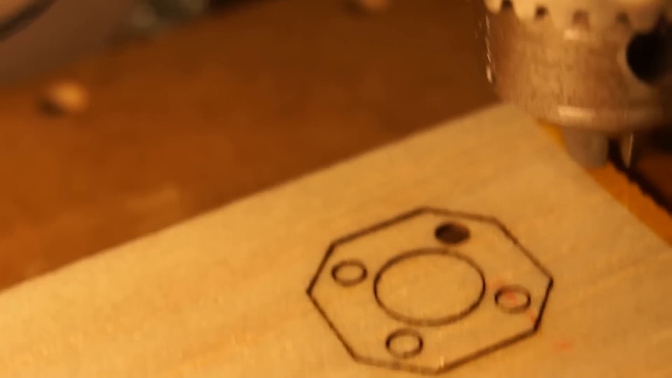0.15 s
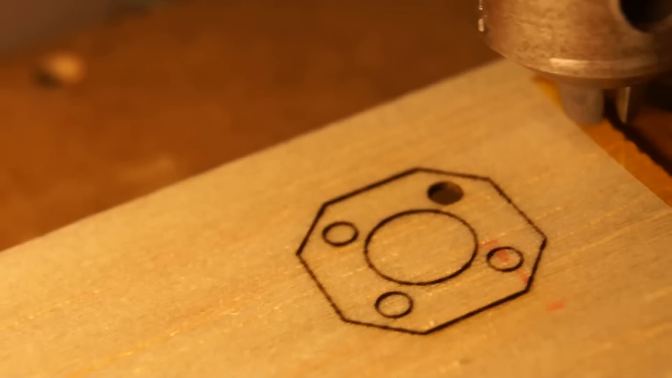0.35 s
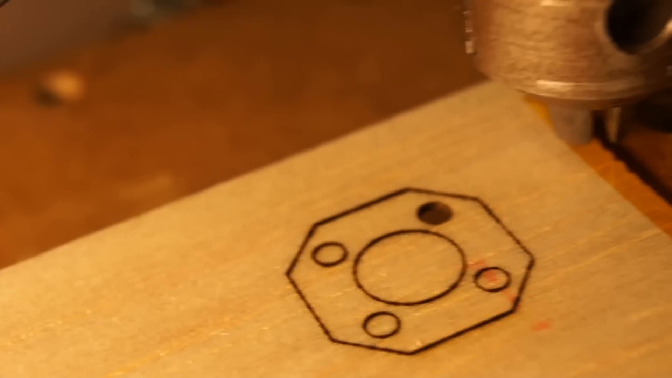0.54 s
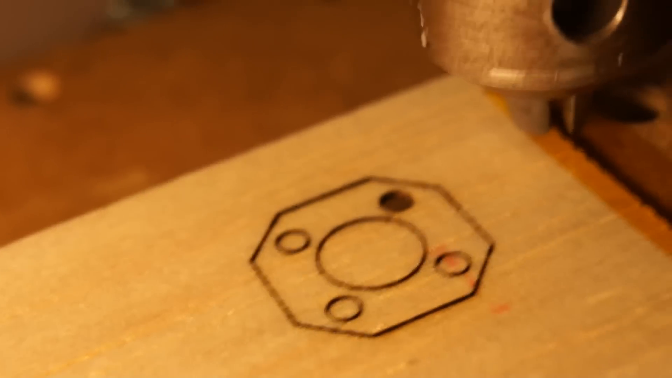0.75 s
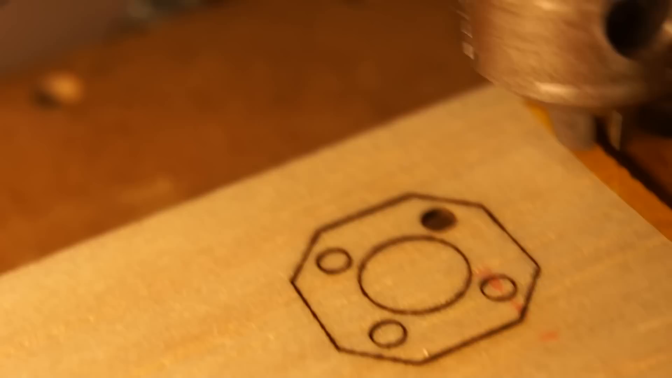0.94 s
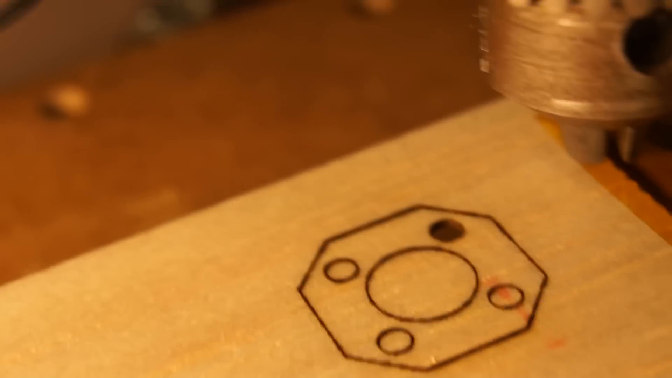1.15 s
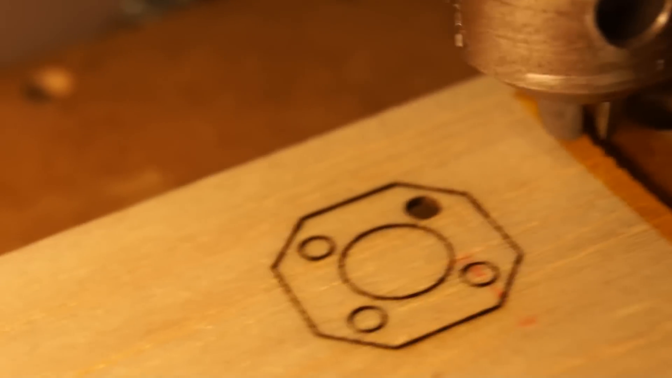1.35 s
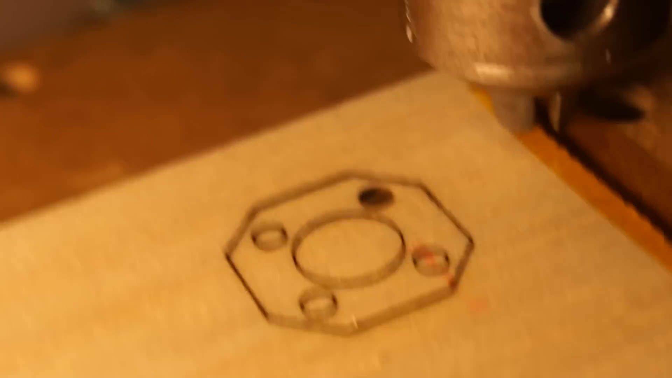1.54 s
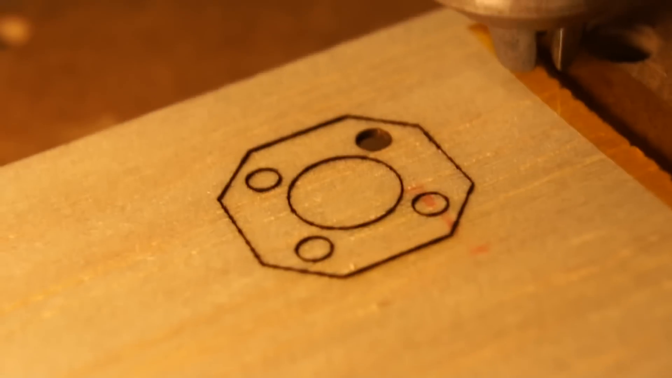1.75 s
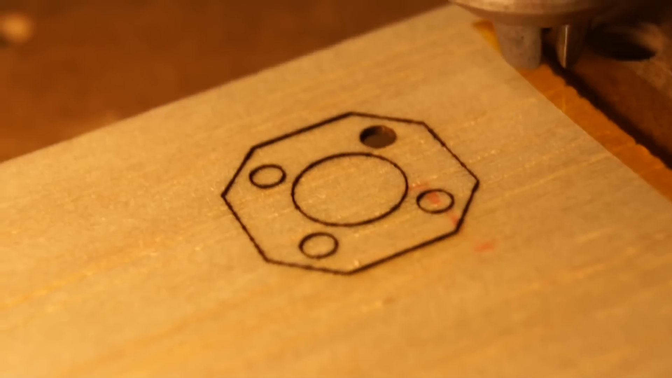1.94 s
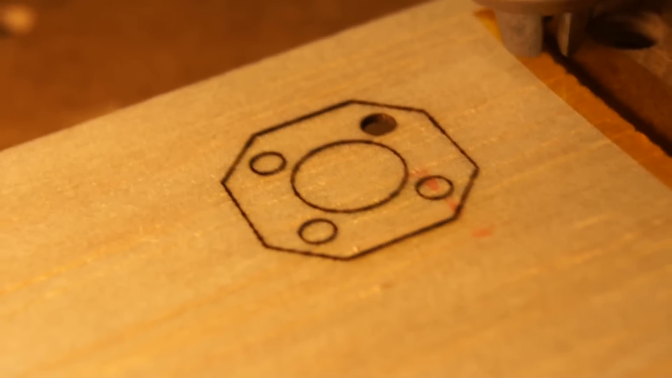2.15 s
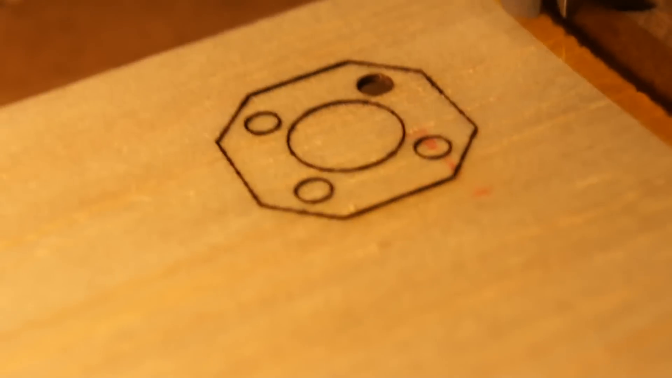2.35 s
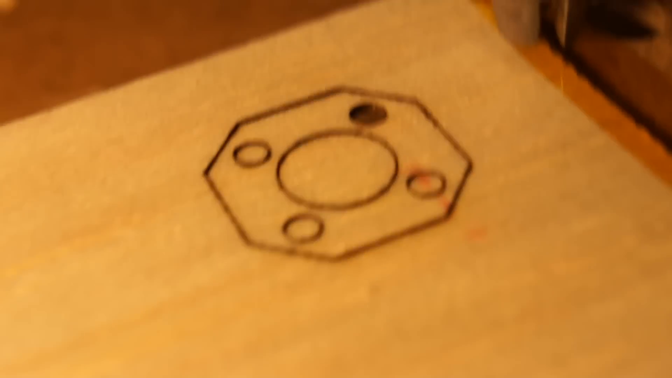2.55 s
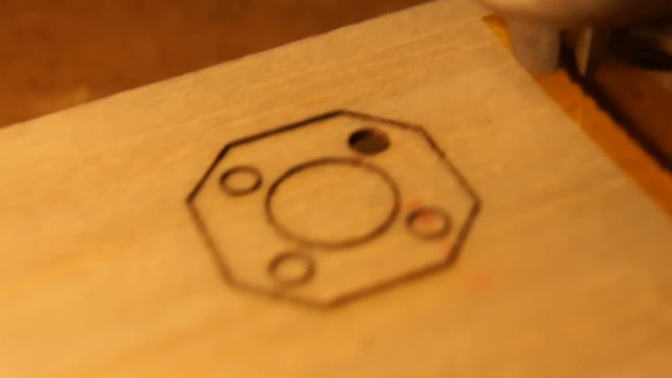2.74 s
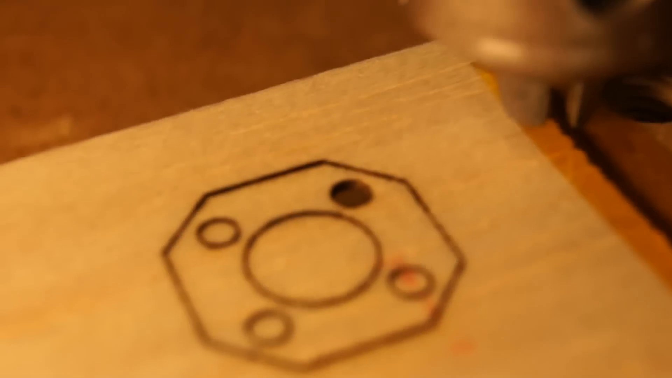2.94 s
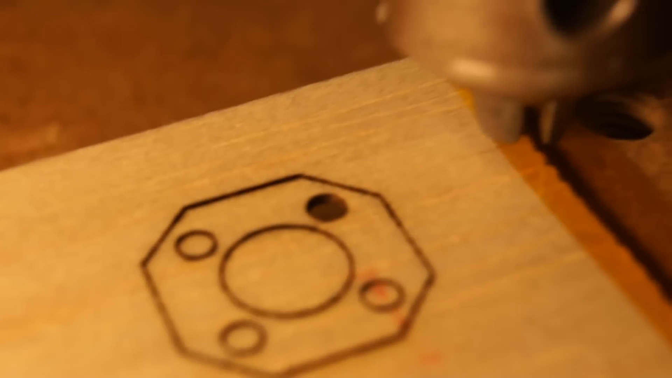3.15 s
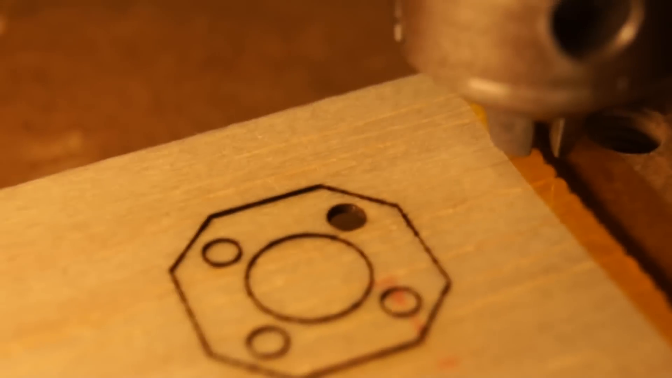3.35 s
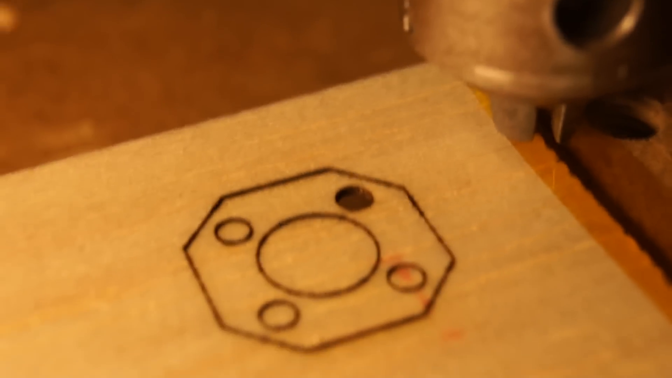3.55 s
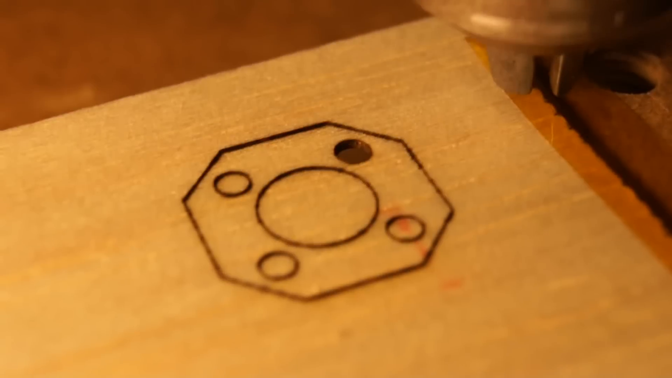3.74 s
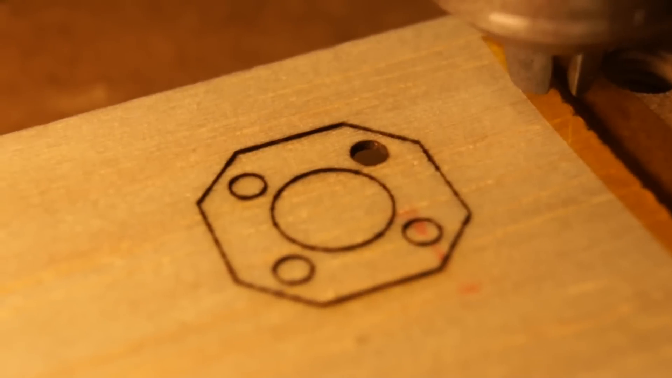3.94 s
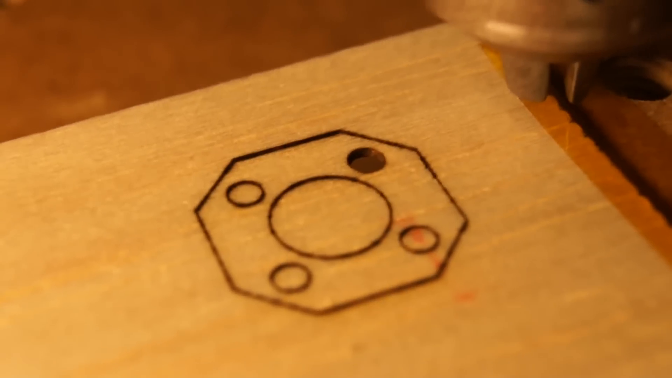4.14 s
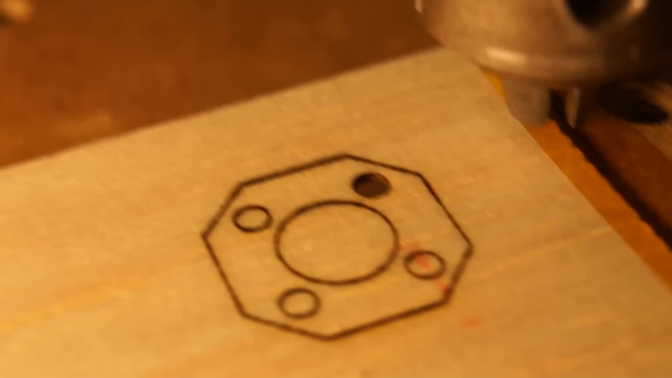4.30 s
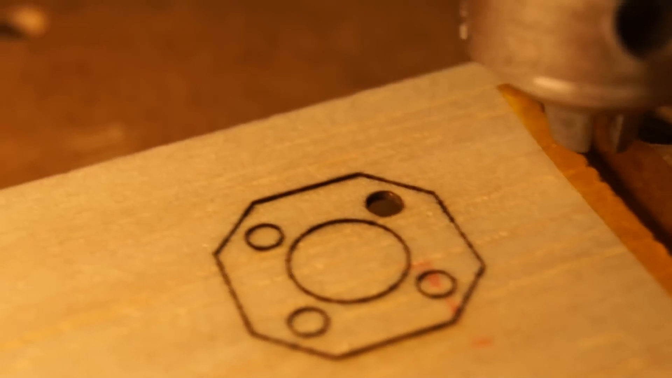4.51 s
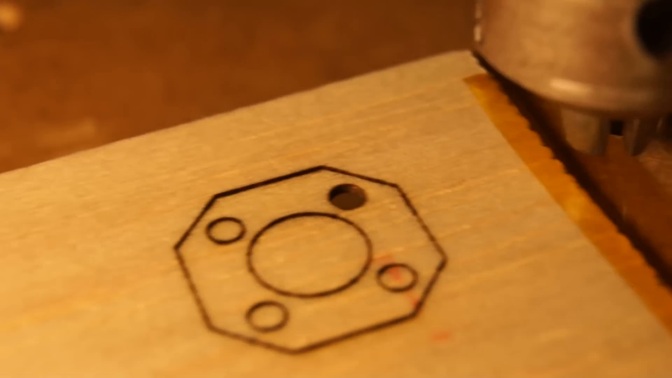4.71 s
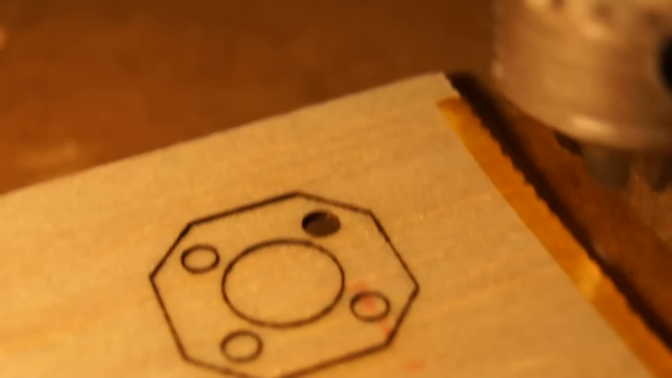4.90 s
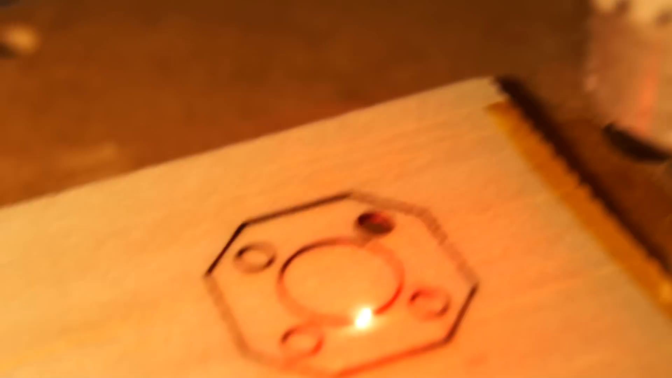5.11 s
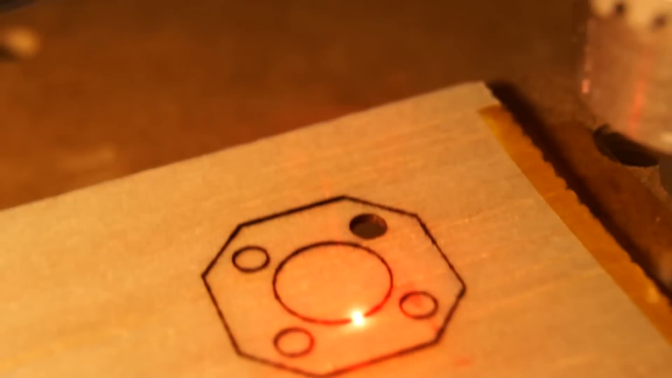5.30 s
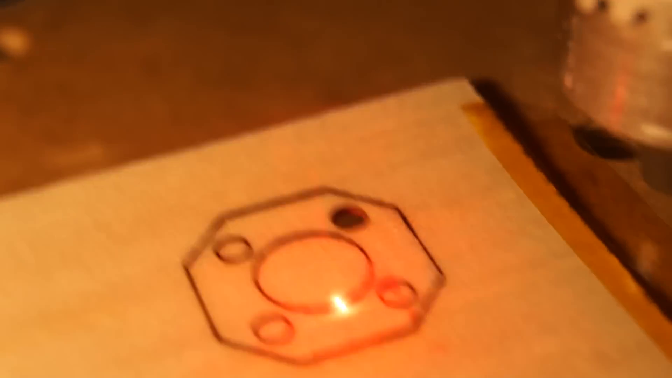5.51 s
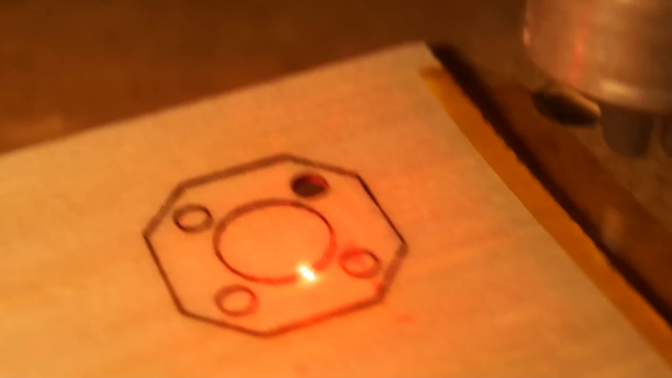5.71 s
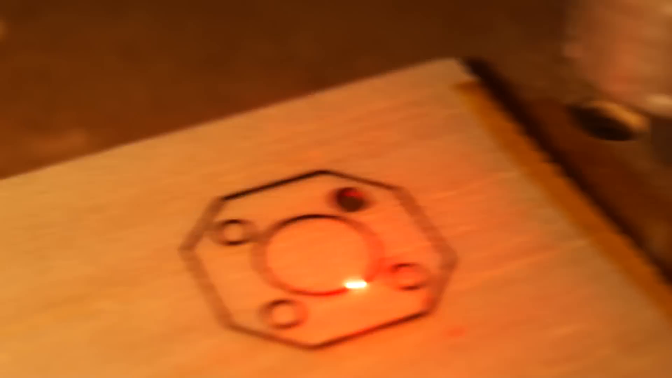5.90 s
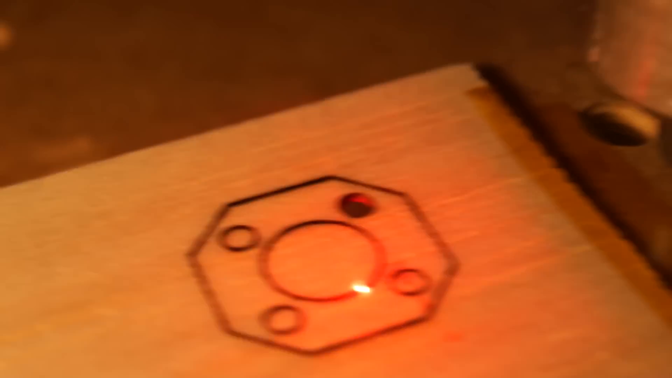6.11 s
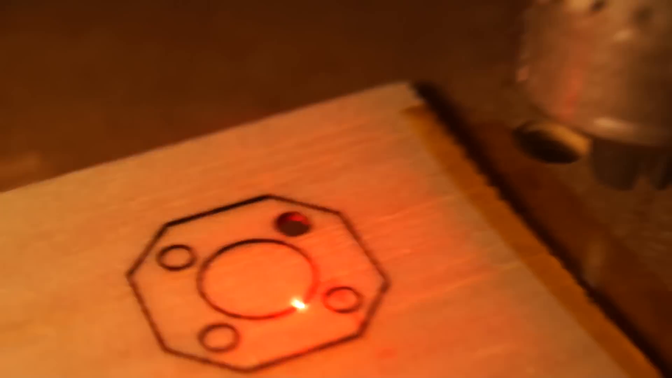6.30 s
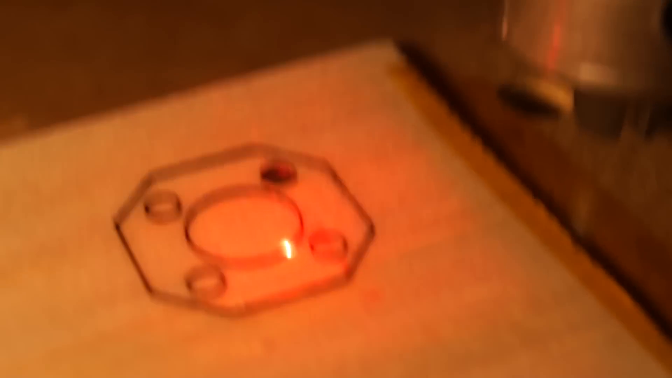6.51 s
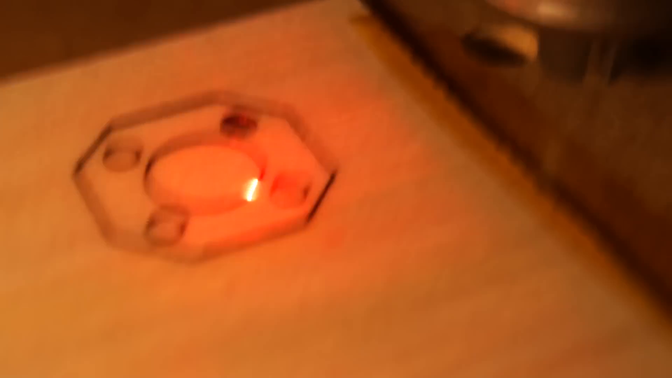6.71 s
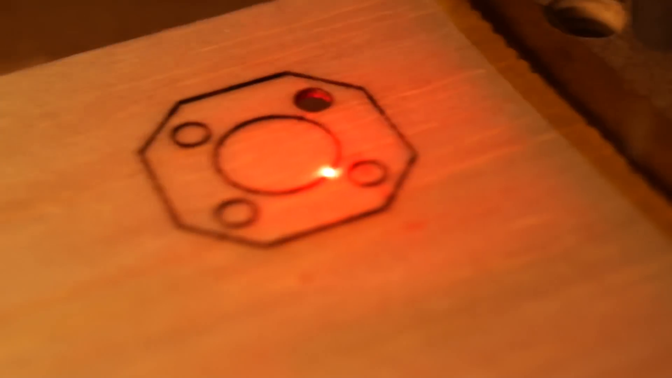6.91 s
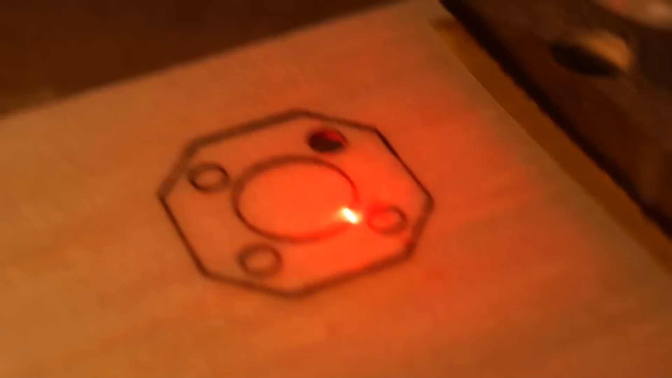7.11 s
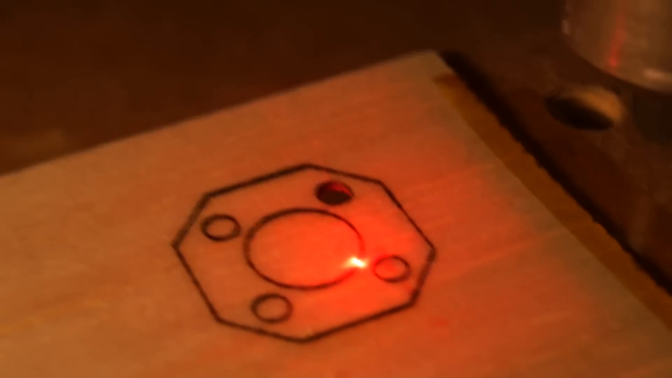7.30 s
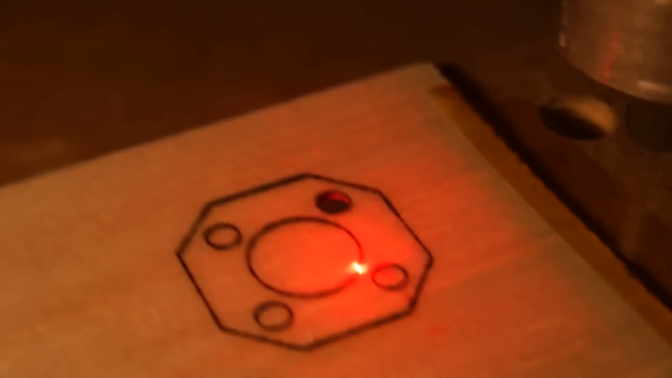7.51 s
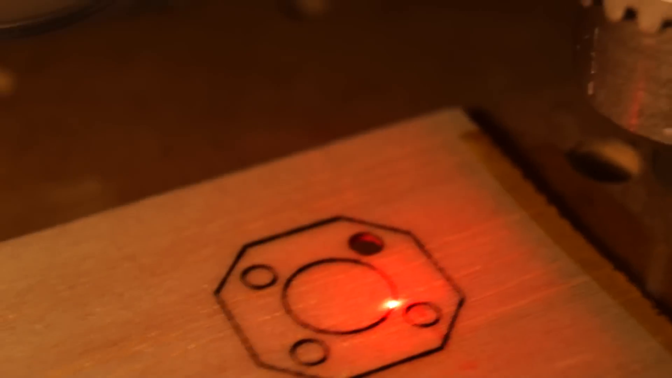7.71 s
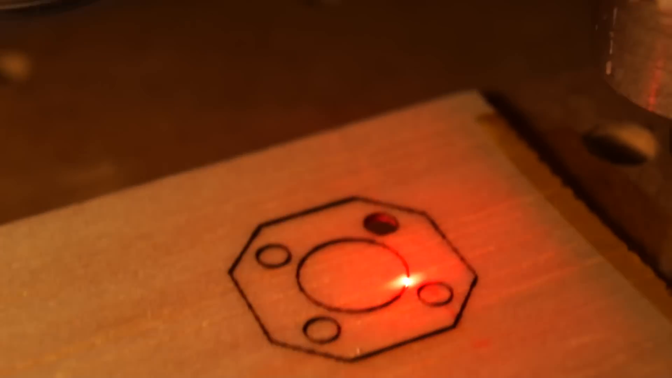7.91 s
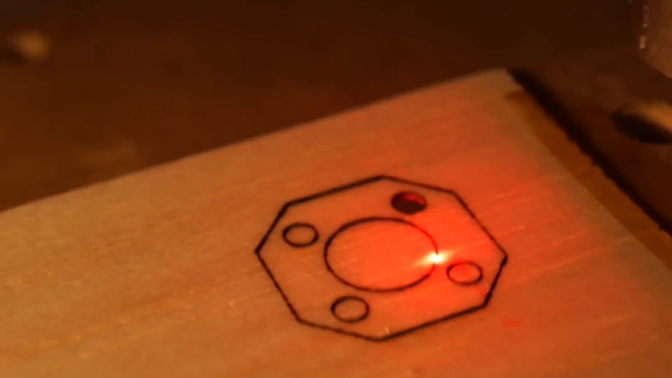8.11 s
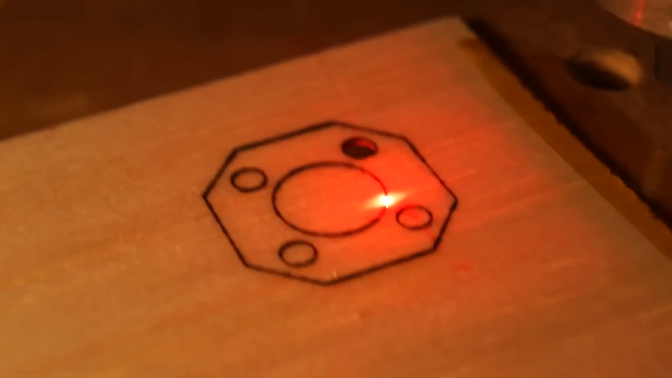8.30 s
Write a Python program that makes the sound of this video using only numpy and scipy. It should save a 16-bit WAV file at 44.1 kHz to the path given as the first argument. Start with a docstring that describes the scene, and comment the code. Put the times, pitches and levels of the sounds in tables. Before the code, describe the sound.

Close fan rush and a thin high electronic whistle, a faint knock, then a short rattling motor buzz settling into a slowly shifting stepper drone.

```python
"""Stepper motors of a small homemade laser engraver, close by, over its fan and the drivers' whistle.
The frame knocks once; the carriage makes a short, rattling rapid move, then starts to trace a circle:
one motor slows as the other speeds up. On the circle each motor sounds multiples of its step rate,
which swell as they sweep through the frame's resonances. Fan, coil and chopper sound from the start."""
import sys
import numpy as np
from scipy import signal
from scipy.fft import rfft, irfft, next_fast_len
from scipy.io import wavfile
from scipy.ndimage import uniform_filter1d, map_coordinates

SR = 44100
rng = np.random.default_rng(int(sys.argv[2]) if len(sys.argv) > 2 else 0)


def dump(signal):
    """Clip the signal to [-1, 1] and save it as 16-bit WAV at the path in sys.argv[1]."""
    limited = np.clip(np.atleast_2d(signal).T, -1, 1)
    pcm = np.round(limited * 32767).astype(np.int16)
    wavfile.write(sys.argv[1], SR, pcm)


N = 368235
TIME_S = np.arange(N) / SR

# fan rush, slow drift: t/s, relative level/dB
FAN_LEVEL = [(0, -43.5), (2.5, -44), (3.0, -44.8), (4.4, -44.5), (5.4, -43.5), (7.4, -44.5)]
# fan rush spectrum: f/Hz, relative density/dB
FAN_AIR = [(30, -28), (115, -34), (350, -6.5), (600, -7.5), (800, -0.5), (1200, -8.5), (1380, -9.5),
           (2050, -4), (2380, -10.5), (2850, 1.5), (3450, -5.5), (3950, 1), (6800, -9.5), (8500, -11),
           (12000, -19), (15500, -58)]
# fan hum and the frame singing along: f/Hz, relative level/dB
FAN_HUM = [(88, -83.5), (172, -74), (179, -69), (263, -68), (711, -60.5), (1194, -56), (1243, -55.5),
           (1696, -56.5), (3731, -57)]
# coil of the resting motor: t/s, relative level/dB
COIL_LEVEL = [(0, -58), (0.3, -51), (1.5, -53.5), (2.7, -59.0), (3.2, -53.5), (4.4, -55.5)]
# chopper whistle in standing waves: t/s, relative left level/dB, relative right level/dB
WHISTLE_LEVEL = [(0, -43, -36), (0.25, -37.5, -33.5), (0.8, -40.0, -40.5), (1.1, -38.5, -35),
                 (1.7, -39.5, -38.5), (2.4, -41, -38.5), (2.9, -47, -34), (3.4, -41, -34.5),
                 (4.4, -44.5, -35), (5.3, -41, -30.5), (6.1, -42, -37), (6.9, -42, -36), (7.08, -44.5, -39),
                 (7.6, -42, -41), (8.05, -40.5, -37), (8.35, -39.5, -42.5)]
# thumps of the frame, from knocks and from motors sweeping through a resonance:
# t/s, level/dB, spread/octaves, t60/s
FRAME_THUMPS = [(1.032, -17, 1.6, 0.073), (4.435, -21, 1.2, 0.046), (4.453, -9, 0.54, 0.021),
                (4.557, -14, .8, 0.022), (4.709, -14, 0.52, .03), (4.945, -12, 0.43, 0.024),
                (5.124, -9, 0.88, 0.057)]
# short high ticks, from metal parts and from a braking motor crossing a resonance:
# t/s, level/dB, pitch/Hz
HIGH_TICKS = [(1.038, -3, 3990), (5.093, 4, 3580), (7.765, -8.5, 2960)]
# rapid move, both motors: f at full speed/Hz, relative level/dB
RAPID_WHINE = [(948, -34), (988.3, -26.5), (1976.5, -42), (2530, -47.5), (2987, -37.5), (3953, -39),
               (5060, -43.5)]
# tones shaking the frame while speed changes: f at full speed/Hz, level/dB
SPEED_CHANGE_TONES = [(2530, -23), (3953, -28)]
# force spectrum of the chattering slides: f/Hz, relative density/dB
SLIDE_CHATTER = [(150, 11), (330, 2.5), (700, 0.5), (1100, 2), (1700, -2), (2300, -3.5), (3000, 6.5),
                 (4200, 4.5), (7000, 8.5), (14000, -4)]
# driver hiss spectrum: f/Hz, relative density/dB
DRIVER_HISS = [(9000, -40), (10700, -10), (11200, 5), (13300, -0.5), (14600, -1), (15600, -8.5)]
# x motor force: multiple of step rate, relative level/dB
X_MOTOR_ORDERS = [(2, -42.5), (4, -37.5), (5, -51), (6, -42.5), (8, -43.5), (10, -45), (12, -41.5),
                  (14, -46), (16, -33), (18, -53), (32, -49)]
# y motor force: multiple of step rate, relative level/dB
Y_MOTOR_ORDERS = [(1, -36.5), (2, -42), (3, -44), (4, -43.5), (5, -48.5), (6, -47), (7, -46.5), (8, -33),
                  (9, -50.5), (10, -48.5), (11, -58), (12, -44.5), (15, -44), (16, -33), (24, -34.5),
                  (32, -34.5), (40, -34.5)]
# x axis on the circle: top step rate/Hz, turning speed/(rad/s), start/s
X_CIRCLE = (210.57, .3355, 5.168)
# y axis on the circle: top step rate/Hz, turning speed/(rad/s), start/s
Y_CIRCLE = (268.4, .3392, 5.182)
# rub of a slide, spectrum: f/Hz, relative density/dB
RUB_HISS = [(2500, -28), (4200, 13), (6500, -26), (10000, -22)]
# resonances of frame and bed:
# f/Hz, width/Hz, level from x motor/dB, level from y motor/dB, level from slides/dB
FRAME_MODES = [(174.9, 11.8, 11, -7, -13), (262.2, 20.5, -26, 1.5, -10), (312.2, 13.3, -8.5, 1.5, -17),
               (380, 35, -7.5, -6, -9), (481, 44.6, -6.5, -1.5, -2.5), (662.5, 38.6, 5.5, -14, -7),
               (686, 28.7, -18.5, 3.5, 2), (768.6, 32.6, 4, 5.5, 4.5), (860, 72, -11, -4, 1),
               (939.5, 26, 8.5, -16, 4.5), (1035, 67, 6, -0.5, 1), (1178, 67, -2.5, -17, -1),
               (1613, 84, -3.5, 1.5, -5), (1702, 45, -0.5, 9, 4.5), (1988, 157, -4, -12, -3),
               (2823, 250, -7.5, -7, -6.5), (3870, 420, -6.5, -14.5, -15), (5200, 1900, -25, -32, -28.5)]
# room decay: f/Hz, t60/s
ROOM_DECAY = [(200, 0.045), (2000, 0.24), (10000, 0.018)]
# stereo balance: f/Hz, left minus right/dB
SIDE_BALANCE = [(100, -1), (300, -3), (700, -2), (1500, -3), (4400, -6), (8000, -6), (15000, -20)]

COIL_HZ = 11171
WHISTLE_HZ, CUTTING_RISE_HZ, RAPID_SAG_HZ = 9866, 4.6, 12
THUMP_HZ = 878
TICK_SPREAD_OCT, TICK_T60_S = 0.85, 0.032
RAPID_START_S, RAPID_STOP_S, RUN_UP_S, BRAKE_S = 4.424, 5.156, .097, .083
MOTOR_ON_S = .025
SLACK_DB, TAKE_UP_S = -2.5, 0.57  # x motor starts unloaded until its screw takes up the slack
RUB_S, RUB_ATTACK_S, RUB_RELEASE_S, RUB_DB = 6.55, 0.07, 0.67, -41
WALLS_DB, WHINE_WALLS_DB = -11, -15
TOP_HZ = 15750


def amp(db):
    """Decibels to gain."""
    return 10 ** (np.asarray(db) / 20)


def unit(x):
    """x at rms 1."""
    return x / np.sqrt(np.mean(x ** 2) + 1e-20)


def along(points, hz):
    """(Hz, value) points read on a log axis."""
    f, v = np.transpose(points)
    return np.interp(np.log(hz + 1), np.log(f + 1), v)


def curves(rows):
    """One value per sample for each column after the time."""
    s, *cols = np.transpose(rows)
    return [np.interp(TIME_S, s, c) for c in cols]


def wobble(rate_hz):
    """Smooth random curve, rate_hz knots a second."""
    return map_coordinates(rng.standard_normal(4096), [TIME_S * rate_hz], mode="wrap")


def turning(hz):
    """Phase (rad) of a moving frequency."""
    return 2 * np.pi * np.cumsum(hz) / SR


def filtered(x, response):
    """x times a complex response of frequency."""
    size = next_fast_len(N + SR // 2, real=True)
    hz = np.fft.rfftfreq(size, 1 / SR)
    return irfft(rfft(x, size) * response(hz), size)[..., :N]


def noise(spectrum):
    """Coloured noise of rms 1."""
    return unit(filtered(rng.standard_normal(N), lambda hz: amp(along(spectrum, hz))))


def fan():
    """Fan shakes the frame, hums and blows, partly from all sides: (force, direct, diffuse)."""
    air_db, = curves(FAN_LEVEL)
    shaking = amp(-32) * rng.standard_normal(N)
    hum = 0
    for hz, db in FAN_HUM:
        level = amp(db + 5.5 + 1.9 * wobble(5.8))
        hum = hum + level * np.sin(turning(hz + 1.04 * wobble(12)))
    direct = hum + amp(air_db + 4.5) * noise(FAN_AIR)
    side_db = np.array([[-4], [.5]])
    diffuse = amp(air_db + side_db) * np.array([noise(FAN_AIR), noise(FAN_AIR)])
    return shaking, direct, diffuse


def coil():
    """One coil sings for as long as its motor stands still."""
    level_db, = curves(COIL_LEVEL)
    resting = np.clip((RAPID_START_S - TIME_S) / MOTOR_ON_S + 1, 0, 1)
    return resting * amp(level_db + 5.5) * np.sin(2 * np.pi * COIL_HZ * TIME_S)


def whistle(lead_rad=0.61, waver_db=.3, flutter_db=0.5):
    """Current chopper: higher once cutting, sagging with rapid speed; level wavers on each side."""
    hz = WHISTLE_HZ + CUTTING_RISE_HZ * (TIME_S > RAPID_STOP_S) - RAPID_SAG_HZ * rapid_speed()
    ripple_rad = 0.057 * np.sin(2 * np.pi * 100 * TIME_S)  # supply ripple bends the pitch
    phase = turning(hz) + ripple_rad
    sides = [amp(db + 5 + waver_db * wobble(25) + flutter_db * wobble(250))
             for db in curves(WHISTLE_LEVEL)]
    return np.array(sides) * np.sin([phase, phase + lead_rad])


def shudders(rows, rise_s=0.0015, rattle=0.55):
    """Brief decaying forces (s, dB, Hz, octaves, t60 s): a tone plus a noisy clatter around it."""
    force = np.zeros(N + SR)
    t = np.arange(SR // 5) / SR
    hz = np.fft.rfftfreq(len(t), 1 / SR)
    for s, db, pitch_hz, spread_oct, t60_s in rows:
        octaves = np.log2((hz + 1) / pitch_hz)
        colour = 1 / np.sqrt(1 + (octaves / spread_oct) ** 6)
        random_phase = np.exp(2j * np.pi * rng.random(len(hz)))
        clatter = unit(irfft(colour * random_phase, len(t)))
        shudder = np.sin(2 * np.pi * pitch_hz * t) + rattle * (1 + spread_oct) * clatter
        envelope = amp(db - 60 * t / t60_s) * (1 - np.exp(-t / rise_s))
        force[round(s * SR):][:len(t)] += envelope * shudder
    return force[:N]


def thumps_and_ticks():
    """Frame thumps all share one pitch; ticks are higher and share one decay."""
    thumps = [(s, db, THUMP_HZ, spread, t60) for s, db, spread, t60 in FRAME_THUMPS]
    ticks = [(s, db, hz, TICK_SPREAD_OCT, TICK_T60_S) for s, db, hz in HIGH_TICKS]
    return shudders(thumps + ticks)


def rapid_speed():
    """Share of full speed in the rapid move: even run-up, cruise, braking."""
    run_up = (TIME_S - RAPID_START_S) / RUN_UP_S
    braking = (RAPID_STOP_S - TIME_S) / BRAKE_S
    return np.clip(np.minimum(run_up, braking), 0, 1)


def ramping():
    """Smoothed gate: 1 between a quarter of and full speed in the rapid move, else 0."""
    speed = rapid_speed()
    return uniform_filter1d(1.0 * ((speed > .25) & (speed < 1)), size=512)


def rapid_move(strain_db=1):
    """Racing motors sweep rough tones; loose screws and slides chatter: (frame force, direct whine)."""
    speed = rapid_speed()
    change = ramping()
    phase = turning(speed * (1 + 0.00089 * wobble(70)))  # 1 Hz at full speed
    throb = np.sin(turning(58.0 * speed))  # carriage shakes in step with its speed
    whine = sum(amp(db + 1.8 * wobble(40)) * np.sin(hz * phase) for hz, db in RAPID_WHINE)
    whine = whine * speed ** 2 * amp(0.57 * throb)
    rough = unit(amp(2.3 * wobble(220) + 1.9 * throb) * noise(SLIDE_CHATTER))
    chatter = amp(-11 + strain_db * change) * np.sqrt(speed) * rough
    surge = 0
    for hz, db in SPEED_CHANGE_TONES:
        surge = surge + amp(db + 2.3 * wobble(300)) * np.sin(hz * phase + 0.59 * wobble(400))
    return chatter + change * surge, whine


def sizzle(left_db=-59, right_db=-48.0, ramp_db=4):
    """Drivers hiss once the motors step, most while they change speed."""
    moving = np.clip((TIME_S - RAPID_START_S) / MOTOR_ON_S, 0, 1)
    sides = [amp(db + ramp_db * ramping()) * noise(DRIVER_HISS) for db in (left_db, right_db)]
    return moving * np.array(sides)


def stepper(step_hz, orders, ripple_hz, flutter_db):
    """Force of one motor: multiples of a slightly uneven step rate."""
    phase = turning(step_hz + ripple_hz * wobble(45))
    force = sum(amp(db) * np.sin(k * phase + rng.uniform(0, 2 * np.pi)) for k, db in orders)
    return force * amp(flutter_db * wobble(60))


def circle(load_db=1.06):
    """Axis speeds follow cosine and sine of the angle, load wanders: forces (x motor, y motor, slides)."""
    x_top_hz, x_rad_per_s, x_start_s = X_CIRCLE
    y_top_hz, y_rad_per_s, y_start_s = Y_CIRCLE
    x_elapsed_s = TIME_S - x_start_s
    running = np.clip(x_elapsed_s / 0.015, 0, 1)
    x_speed = np.cos(x_rad_per_s * np.maximum(x_elapsed_s, 0))
    y_speed = np.sin(y_rad_per_s * np.maximum(TIME_S - y_start_s, 0))
    slack_db = SLACK_DB * np.clip(1 - x_elapsed_s / TAKE_UP_S, 0, 1)
    x_level = amp(4.0 + slack_db + load_db * wobble(2.8)) * running
    y_level = amp(4.5 + load_db * wobble(2.95)) * np.sqrt(y_speed)
    x_motor = x_level * stepper(x_top_hz * x_speed, X_MOTOR_ORDERS, ripple_hz=0.33, flutter_db=0.0)
    y_motor = y_level * stepper(y_top_hz * y_speed, Y_MOTOR_ORDERS, ripple_hz=0.586, flutter_db=0.35)
    slides = amp(-26.0) * running * rng.standard_normal(N) * amp(1.0 * wobble(40))
    return x_motor, y_motor, slides


def rubbing():
    """Soft hiss of a slide rubbing on the circle: swells quickly, fades."""
    knots_s = [0, RUB_ATTACK_S, RUB_ATTACK_S + RUB_RELEASE_S]
    swell = np.interp(TIME_S - RUB_S, knots_s, [0, 1, 0])
    return amp(RUB_DB) * swell * noise(RUB_HISS)


def frame(force, mount):
    """Causal ringing; the mount (0 x motor, 1 y motor, 2 slides) sets coupling to each resonance."""
    hz = np.fft.rfftfreq(16384, 1 / SR)
    power = sum(amp(db[mount]) ** 2 / (1 + ((hz - centre) / width) ** 2) ** 2
                for centre, width, *db in FRAME_MODES)
    power = power / (1 + (147 / (hz + 1)) ** 18)  # little below 147 Hz
    # minimum phase: fold the cepstrum onto positive time
    cepstrum = irfft(np.log(power + 1e-10) / 2)
    half = len(cepstrum) // 2
    cepstrum = cepstrum * np.r_[1, np.full(half - 1, 2), np.zeros(half)]
    ringing = irfft(np.exp(rfft(cepstrum)))[:half]
    return signal.fftconvolve(force, ringing)[:N]


def room(x):
    """Short diffuse tail for each side, crossfading to a new random tail three times a second."""
    hop = SR // 3
    out = np.zeros((2, N + 2 * SR))
    padded = np.pad(x, (hop, 2 * hop))
    for start in range(0, N + hop, hop):
        hz, t, z = signal.stft(rng.standard_normal((2, hop)), SR, nperseg=256)
        decay = amp(-60 * t / along(ROOM_DECAY, hz)[:, None])
        tail = signal.istft(z * decay, SR, nperseg=256)[1]
        piece = padded[start:][:2 * hop] * signal.windows.cosine(2 * hop)
        wet = signal.fftconvolve(piece[None], tail / np.linalg.norm(tail[0]), axes=1)
        out[:, start:start + wet.shape[1]] += wet
    return out[:, hop:hop + N]


def placed(x, lag_samples, walls_db):
    """Machine stands to the right: left side later and softer; walls add a tail."""
    side = np.array([[.5], [-.5]])
    direct = filtered(x, lambda f: np.exp(-2j * np.pi * f * side * lag_samples / SR))
    both = direct + amp(walls_db) * room(x)
    return filtered(both, lambda f: amp(side * along(SIDE_BALANCE, f) - 1))


def scene():
    """Forces meet in the frame; whine, hum and air radiate directly, racing motors nearer the middle."""
    shaking, blowing, diffuse = fan()
    chatter, whine = rapid_move()
    x_motor, y_motor, slides = circle()
    forces = x_motor, y_motor, slides + thumps_and_ticks() + shaking
    body = sum(frame(force, mount) for mount, force in enumerate(forces))
    machine = placed(body + blowing + rubbing() + coil(), lag_samples=7.2, walls_db=WALLS_DB)
    rattling = placed(frame(chatter, mount=2), lag_samples=5.1, walls_db=WALLS_DB)
    whining = placed(amp(2.0) * whine, lag_samples=2.35, walls_db=WHINE_WALLS_DB)
    return machine + rattling + whining + diffuse + sizzle() + whistle()


def record(dry):
    """Band limit: nothing from TOP_HZ up."""
    return filtered(dry, lambda hz: hz < TOP_HZ)


dry = scene()
out = record(dry)
dump(out)
```